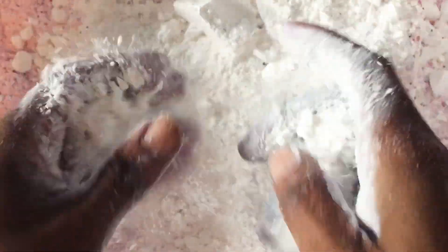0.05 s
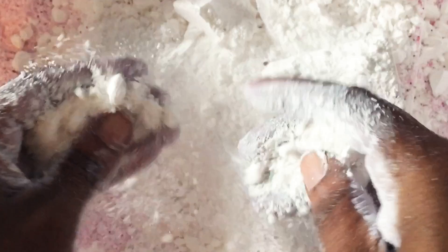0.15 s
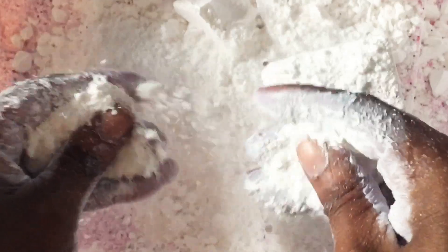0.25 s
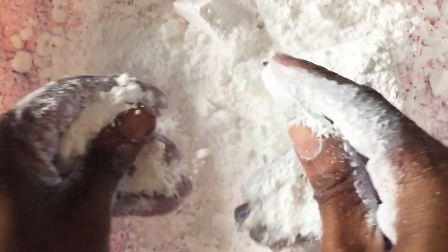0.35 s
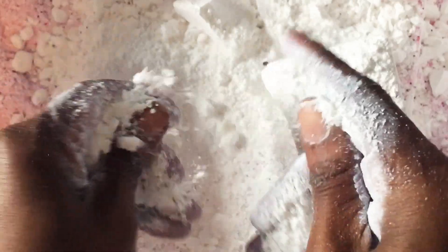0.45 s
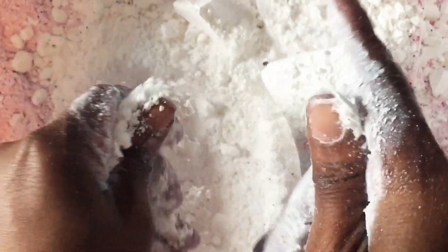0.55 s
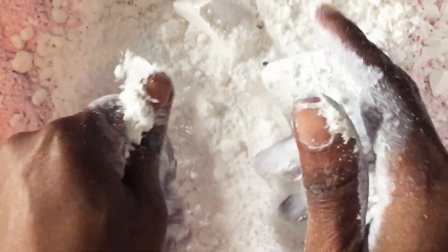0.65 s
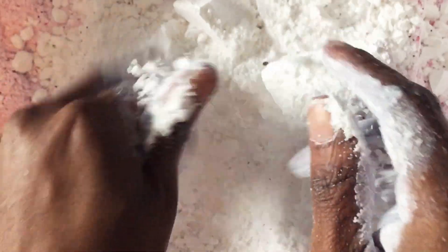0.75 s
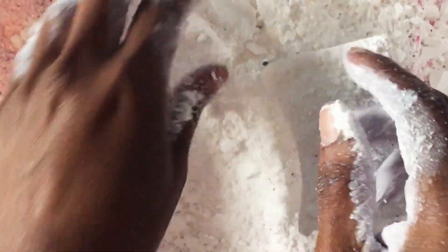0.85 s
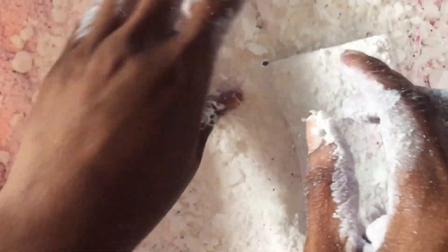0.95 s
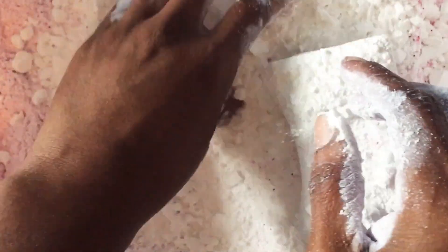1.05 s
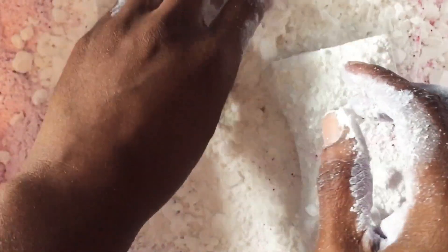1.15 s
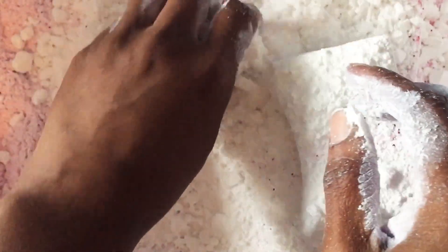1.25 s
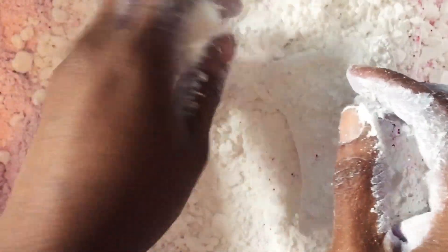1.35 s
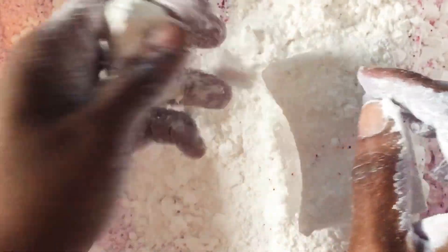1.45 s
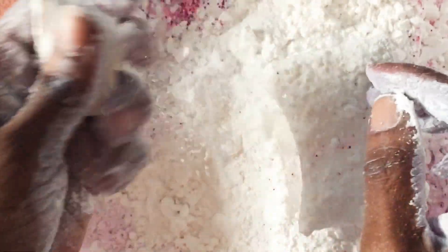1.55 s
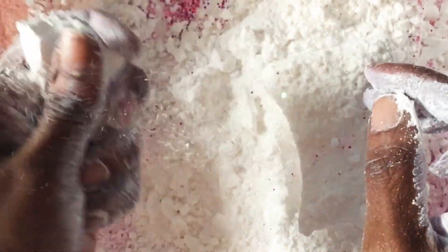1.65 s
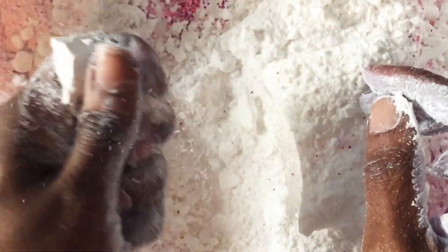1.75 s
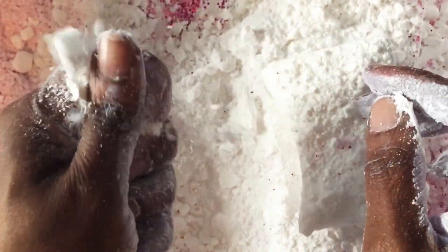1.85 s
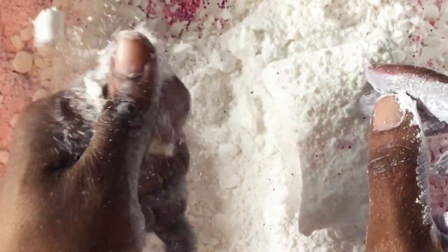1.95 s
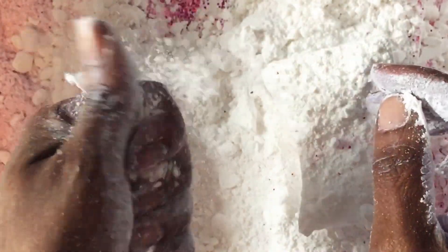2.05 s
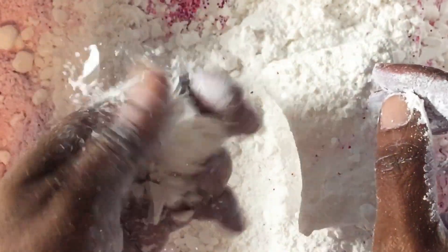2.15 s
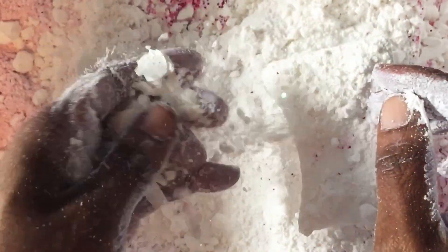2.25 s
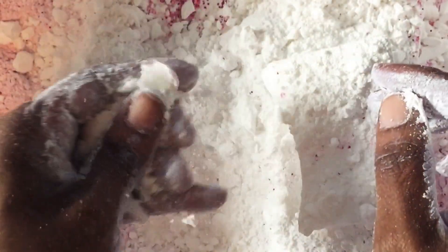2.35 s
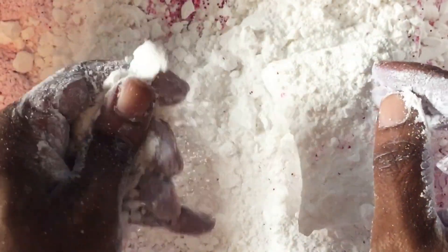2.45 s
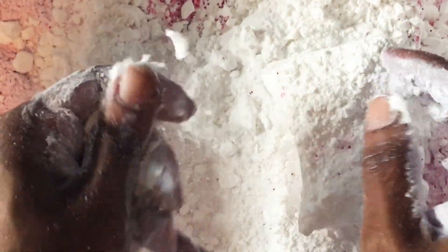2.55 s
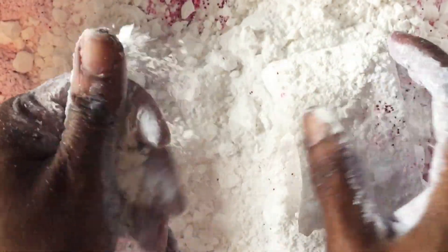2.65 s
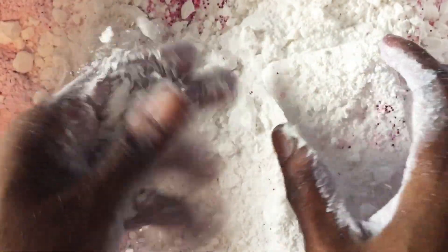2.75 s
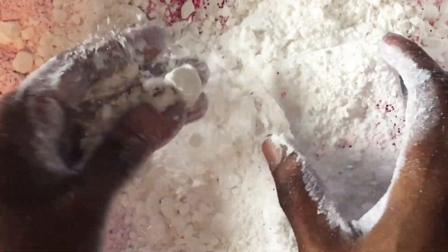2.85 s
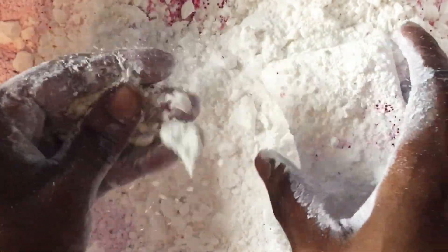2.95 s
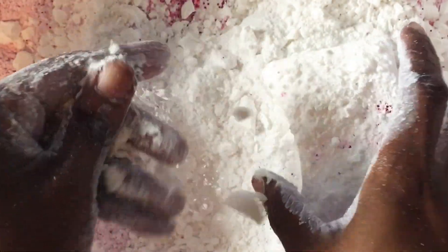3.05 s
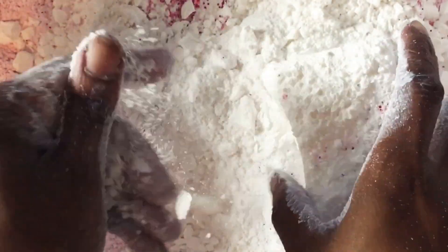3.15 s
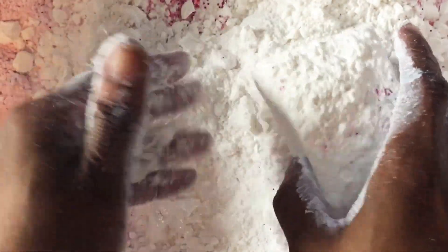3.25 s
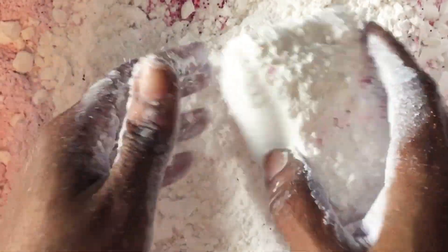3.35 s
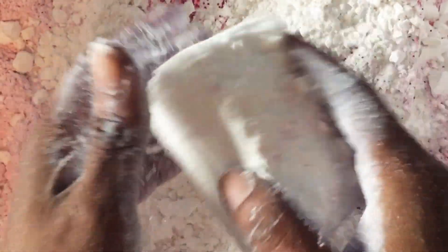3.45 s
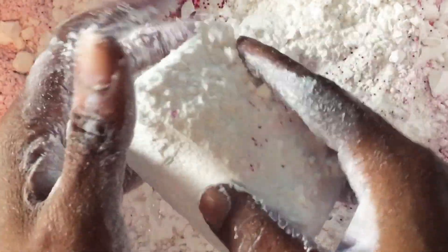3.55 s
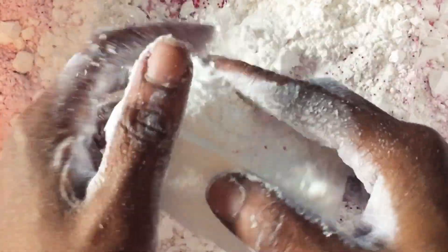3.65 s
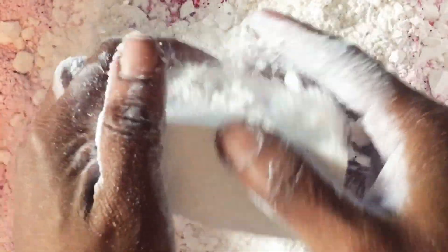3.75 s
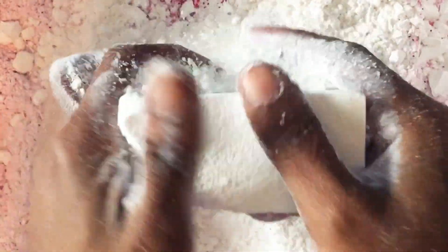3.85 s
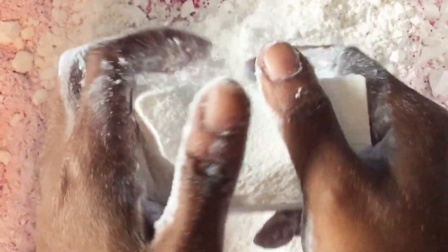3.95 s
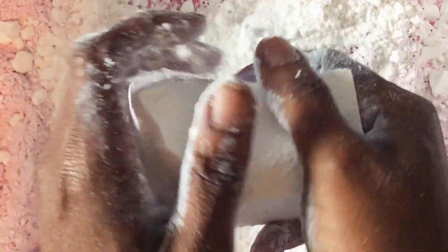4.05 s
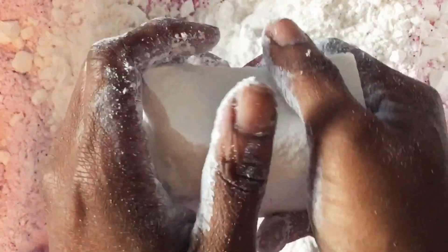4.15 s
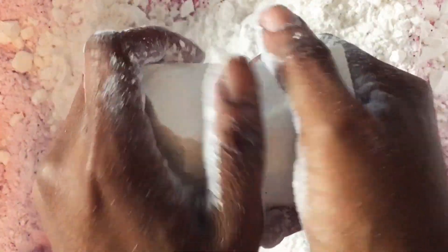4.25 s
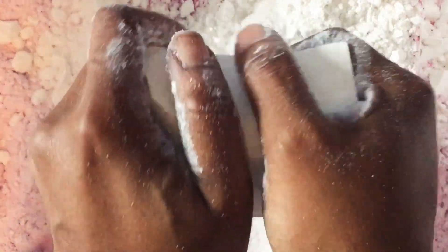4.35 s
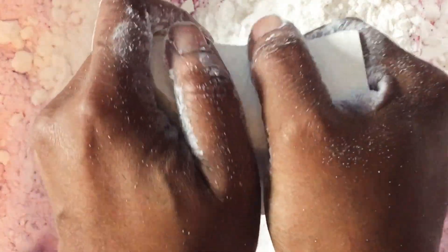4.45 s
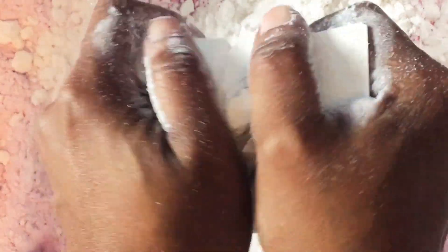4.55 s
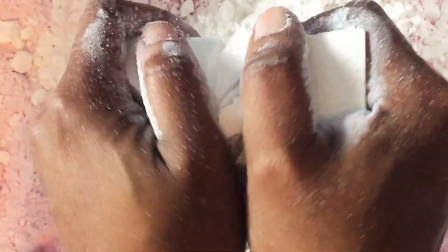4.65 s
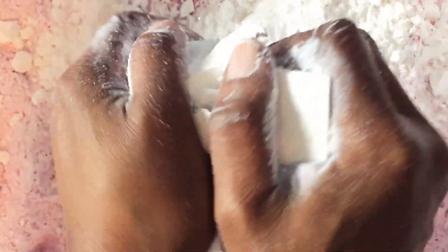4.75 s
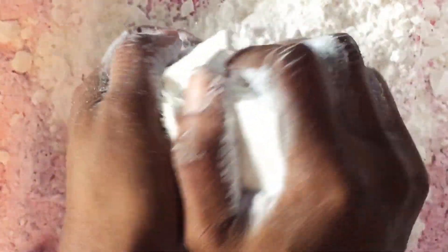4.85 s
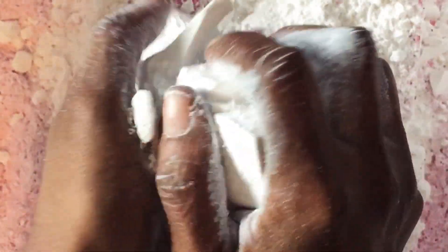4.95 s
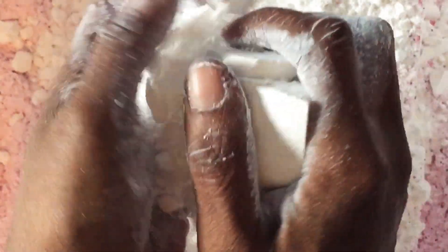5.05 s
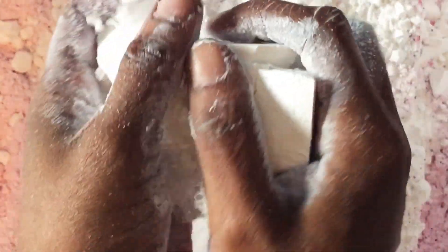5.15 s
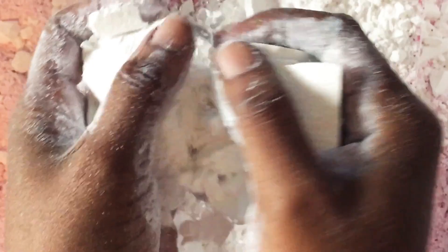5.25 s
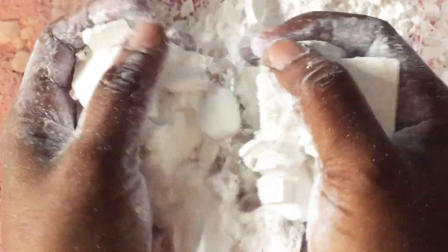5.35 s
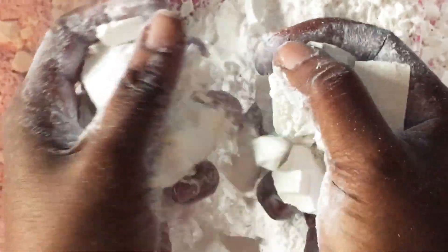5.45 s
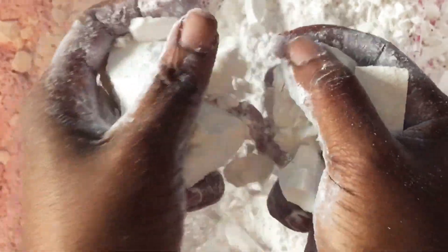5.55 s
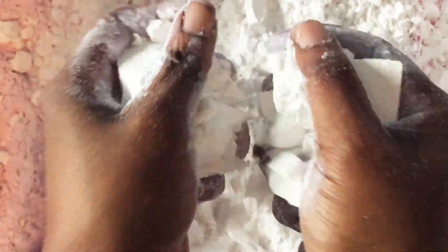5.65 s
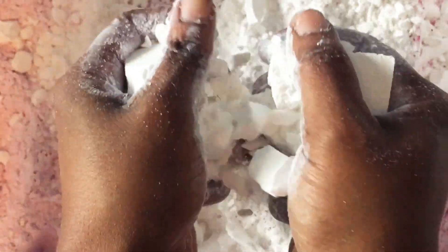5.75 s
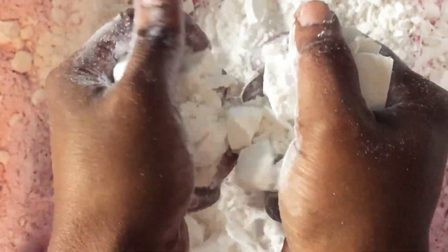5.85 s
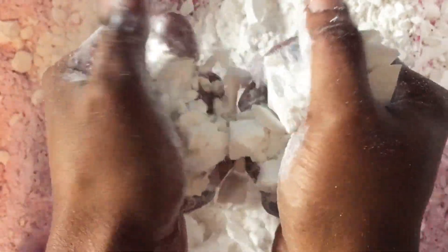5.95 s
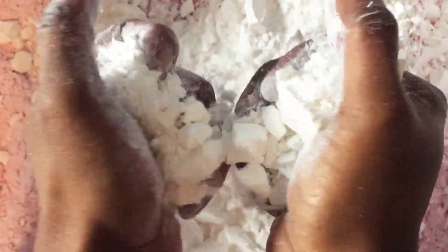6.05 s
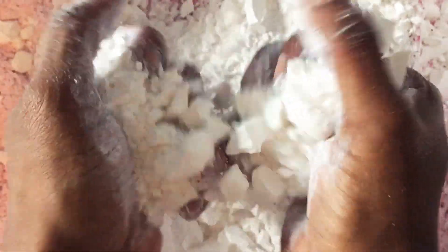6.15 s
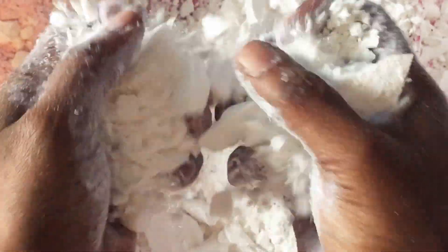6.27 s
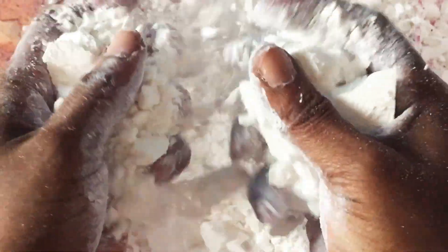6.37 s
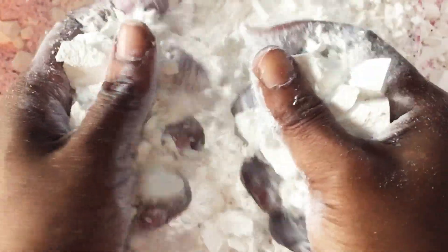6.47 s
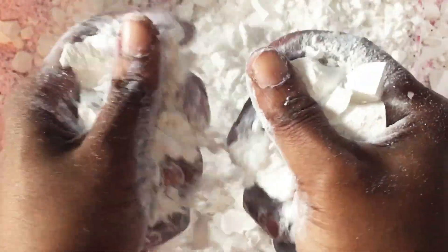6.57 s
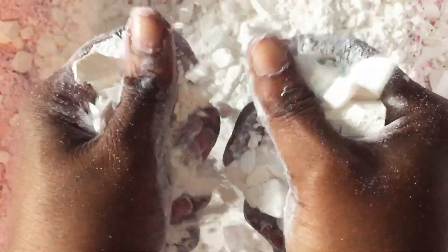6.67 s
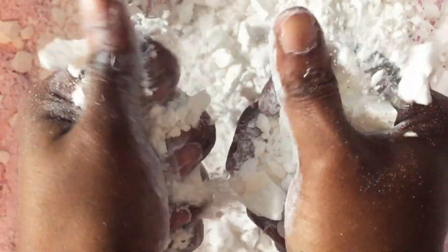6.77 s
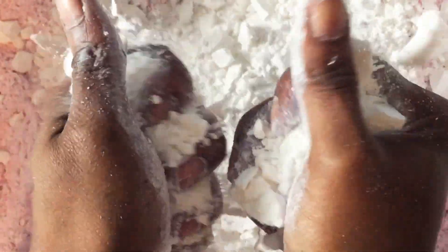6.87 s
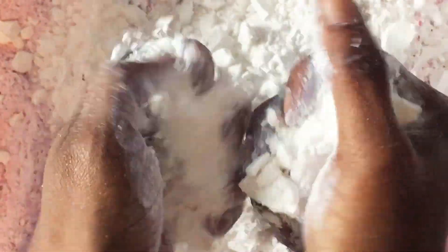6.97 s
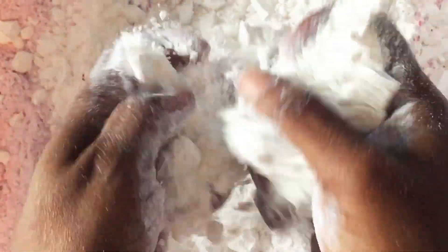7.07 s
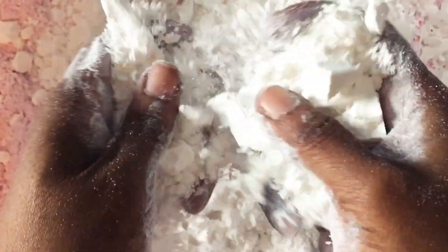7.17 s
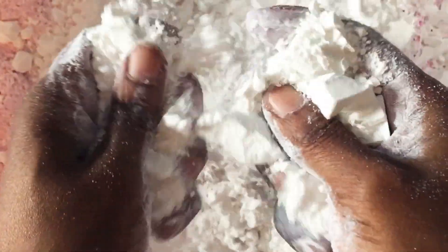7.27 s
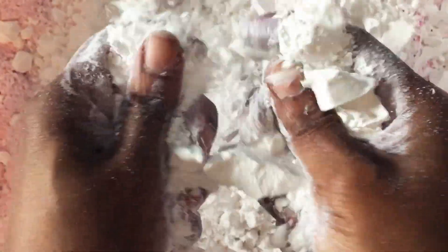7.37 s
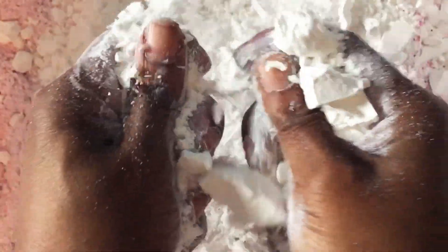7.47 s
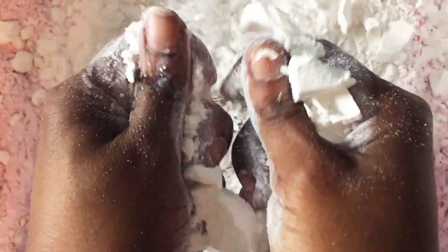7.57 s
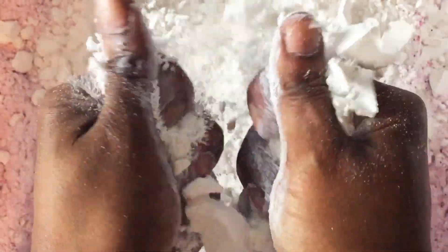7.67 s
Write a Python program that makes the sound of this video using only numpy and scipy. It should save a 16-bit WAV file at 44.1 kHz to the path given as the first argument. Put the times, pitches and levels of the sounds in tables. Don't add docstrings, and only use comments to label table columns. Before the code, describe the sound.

Hands rub powder and break hard dry chalk up close: soft gritty rustling, one very loud sharp snap, then dense crunching and crumbling.

```python
import sys
import numpy as np
from scipy import signal
from scipy.fft import rfft, irfft
from scipy.io import wavfile
from scipy.ndimage import uniform_filter1d

SR = 44100
rng = np.random.default_rng(int(sys.argv[2]) if len(sys.argv) > 2 else 0)


def digitize_waveform(pressure):
    field = np.atleast_2d(pressure).T
    bounded = np.clip(field, -1, 1)
    quanta = np.round(bounded * 32767).astype(np.int16)
    wavfile.write(sys.argv[1], SR, quanta)


def gain_from_decibels(decibels):
    exponent = np.asarray(decibels, float) / 20
    return 10 ** exponent


N = 339999

CORNER_BREAKS = [(1.5712, -27, 1740, -56), (1.5873, -22.5, 1000, -30), (1.6293, -19, 920, -22),
                 (1.6402, -25, 2550, -22), (1.6679, -30, 2290, -18), (1.6816, -19, 1020, -18),
                 (1.717, -35, 2730, -28.5), (1.7581, -13, 1390, -21), (1.775, -32, 674, -26),
                 (1.9102, -29, 920, -22), (2.016, -41, 1450, -36.5), (2.072, -22.5, 570, -32.5),
                 (2.1114, -33, 1590, -28)]
BLOCK_BREAKS = [(4.5337, -16.5, 510, -17), (4.568, -30, 900, -19), (4.5696, -13.5, 515, -16),
                (4.5738, -13, 2800, -14), (4.576, -4.5, 2100, -4.5), (4.5765, 2.5, 2040, -3.5),
                (4.5795, -12, 1900, -10.5), (4.582, -23, 1200, -19), (4.5855, -9, 794, -24),
                (4.5889, -8.5, 900, -10), (4.5898, -10, 2030, -14), (4.6035, -19, 476, -28),
                (4.6062, -25, 700, -28), (4.6162, -14, 2600, -22), (4.618, -15, 1000, -25),
                (4.5772, -6.5, 540, -27), (4.583, -9, 1290, -19), (4.5906, -8.5, 1950, -11),
                (4.5941, -6, 960, -24), (4.598, -10, 1700, -10), (4.6144, -10, 1220, -13),
                (4.75, -22.5, 1400, -21), (4.7667, -21, 1570, -25), (4.8345, -45, 2000, -33),
                (4.9675, -36, 1500, -28), (4.903, -24.5, 1340, -19), (4.93, -23.5, 1670, -33),
                (4.975, -31, 1000, -35), (5.0668, -28, 1140, -27), (5.131, -47, 3180, -19.5),
                (5.225, -27, 1020, -26), (5.2456, -29.5, 2080, -28), (5.3934, -17, 845, -34),
                (5.4199, -28, 1000, -16.5), (5.4944, -26, 1100, -40)]
HALF_BREAKS = [(5.5602, -12, 645, -42), (5.589, -23, 1170, -30), (5.609, -19.5, 487, -42),
               (5.579, -38, 1860, -28), (5.643, -15.5, 530, -20), (5.6543, -8, 870, -10.5),
               (5.668, -15, 1630, -16.5), (5.676, -11, 1400, -13.5), (5.711, -17, 915, -13),
               (5.716, -11.5, 1240, -22), (5.7405, -16.5, 1600, -25), (5.7508, -15, 1240, -32),
               (5.754, -13.5, 840, -31), (5.7743, -18.5, 1050, -24), (5.8353, -21, 1900, -25),
               (5.874, -14, 1460, -20), (5.889, -14.5, 960, -27), (5.936, -22, 1360, -19.5),
               (6.0057, -11, 1220, -20.5), (6.038, -8.5, 770, -13), (6.1064, -10.5, 900, -13.5),
               (6.2731, -13.5, 1740, -20.5)]
LUMP_BREAKS = [(6.335, -40, 840, -21), (6.3812, -13.5, 2400, -35), (6.3971, -22, 1780, -20.5),
               (6.446, -19.5, 1640, -24), (6.4856, -20, 1540, -18.5), (6.4927, -16.5, 2440, -38),
               (6.5297, -26, 1710, -22.5), (6.5365, -13, 970, -25), (6.6408, -27, 930, -25),
               (6.6569, -20.5, 660, -21.5), (6.7497, -12, 1050, -21), (6.758, -16, 1350, -20.5),
               (6.842, -34, 2200, -24), (6.8738, -39, 780, -19.5), (6.9003, -26.5, 750, -26),
               (6.928, -26, 2060, -25.5), (6.938, -25.5, 2270, -19.5), (7.0173, -10.5, 1050, -39),
               (7.131, -31, 920, -31), (7.2732, -15.5, 880, -38), (7.296, -25, 1550, -30),
               (7.3455, -5, 940, -34.5), (7.4446, -19.5, 446, -18.5), (7.5231, -25, 1330, -36),
               (7.588, -23.5, 1590, -27), (7.612, -28.5, 1160, -30.5)]
SMALL_TICKS = [(0.082, -34, 794, -43), (0.598, -34.5, 700, -43), (0.855, -37, 1100, -41.5),
               (2.393, -44, 2000, -34), (3.3845, -35.5, 2910, -43), (3.404, -38.5, 2900, -44),
               (0.1181, -27.5, 2200, -40), (0.1646, -32, 1890, -55), (0.2247, -30.5, 952, -36.5),
               (0.331, -26.5, 2340, -34), (0.6282, -37, 902, -39), (0.895, -33.5, 980, -45),
               (1.246, -50, 2900, -34), (1.279, -55, 2920, -28), (1.294, -43, 2400, -31),
               (2.145, -34, 620, -68), (2.235, -28, 785, -57), (2.274, -33, 2180, -42),
               (2.358, -39, 1890, -34), (2.38, -32.5, 760, -29), (2.456, -31.5, 477, -33),
               (2.6684, -28, 784, -40), (3.019, -25.5, 2850, -47.5), (3.921, -34, 2730, -25.5),
               (4.0027, -31, 1810, -41), (4.0788, -33.5, 1610, -36), (4.176, -35.5, 616, -50),
               (4.2694, -30.5, 1890, -27), (4.4154, -34, 576, -31.5), (0.667, -30, 800, -43),
               (0.0207, -35, 930, -45), (0.0756, -39, 710, -43), (0.0912, -48, 2800, -38),
              (0.1343, -50, 2450, -38), (0.1832, -39, 2610, -47), (0.352, -34, 2970, -39),
              (0.4467, -47, 930, -49), (0.8832, -32, 2530, -47), (0.93, -39, 650, -44),
              (0.9445, -57, 1700, -40), (0.969, -48, 520, -55), (1.076, -37, 820, -50),
              (1.067, -45, 2400, -44), (1.132, -48, 2900, -32.5), (1.154, -33, 2800, -34),
              (1.237, -33, 2600, -36), (1.5657, -38, 880, -38), (1.608, -30, 1010, -34),
              (1.614, -37, 2630, -32), (1.7245, -40, 2990, -31), (1.838, -32, 820, -29),
              (1.9562, -43, 1080, -50), (1.978, -40, 1980, -42), (2.1079, -32, 970, -51),
              (2.1143, -28, 523, -46), (2.165, -41, 880, -42), (2.2278, -40, 2390, -43),
              (2.276, -34, 615, -45), (2.42, -34, 2500, -40), (2.4415, -30, 2780, -33),
              (2.7812, -44, 2930, -40), (2.8502, -44, 1017, -39), (2.952, -40, 520, -46),
              (2.9805, -39, 520, -53), (3.1058, -47, 990, -53), (3.1832, -32.5, 918, -40),
              (3.236, -43, 716, -44), (3.9122, -32, 2430, -28), (4.2783, -39, 2520, -27.5),
              (4.4538, -41, 520, -39), (4.4907, -54, 620, -45), (4.495, -52, 1460, -46),
              (4.5426, -39, 2860, -27), (4.7889, -12, 1480, -9), (4.802, -36, 1190, -23),
              (4.8465, -41, 650, -31), (4.8904, -26, 2090, -19.5), (4.9432, -36, 670, -42),
              (5.0005, -32, 1550, -23), (5.031, -35, 626, -39),
               (5.0901, -31, 1120, -29), (5.171, -30, 930, -45), (5.1829, -31, 600, -26.5),
               (5.1858, -31, 710, -34), (5.3545, -42, 2990, -30), (5.413, -23.5, 1060, -28),
               (5.4256, -27, 725, -19.5), (5.457, -27, 1000, -35), (5.4744, -34, 1080, -26),
               (5.596, -29, 2150, -30), (5.6158, -16.5, 910, -20.5), (5.6253, -21, 2070, -16),
               (5.6508, -18, 2540, -15), (5.6808, -19, 1510, -24), (5.7294, -31, 2280, -23),
               (5.7813, -30, 650, -27), (5.8055, -32, 990, -39), (5.8195, -29, 1850, -28),
               (5.8374, -23.5, 730, -28), (5.8445, -29, 2170, -31), (5.8573, -30, 1270, -33),
               (5.9229, -29, 1210, -26), (5.9279, -26.5, 930, -31), (6.083, -35, 2540, -42),
               (6.2862, -30, 1250, -34), (6.3063, -40, 750, -39), (6.4288, -24, 2260, -35),
               (6.4541, -26, 1270, -22), (6.4595, -32, 2710, -27), (6.4642, -32, 840, -24),
               (6.495, -25, 2280, -30), (6.5011, -24, 1170, -37), (6.5044, -38, 2480, -28),
               (6.629, -28, 580, -34), (6.646, -39, 540, -30), (6.6942, -45, 1230, -26.5),
               (6.7027, -34, 840, -44), (6.7087, -29, 2000, -30), (6.7738, -34, 2860, -28),
               (6.8306, -41, 880, -35), (6.9147, -32, 1440, -28), (7.008, -33, 520, -38),
               (7.012, -36, 2990, -33), (7.085, -29, 1850, -51), (7.2672, -30, 1130, -35),
               (7.3657, -29, 520, -31), (7.4532, -23.5, 940, -22), (7.467, -33, 1100, -38),
               (7.5934, -33, 515, -26.5), (7.6737, -27, 1250, -41)]

# (start [s], length [s], rising share [0-1], effort [dB], fine grit re effort [dB])
STROKES = [(0, 0.15, 0.01, -56, -9), (.14, 0.39, 0.22, -53, -8), (.5, 0.42, 0.96, -56, -6),
           (1.02, 0.09, 0.4, -43.5, -30), (1.12, .1, 0.57, -37, -14.5), (1.185, 0.084, .75, -35, -18),
           (1.25, 0.085, 0.13, -35, -19.5), (1.33, 0.16, 0.5, -50.5, -8.5), (1.52, 0.45, 0.7, -55.5, -4.5),
           (2.0, 0.23, 0.45, -52.5, -10), (2.2, 0.32, 0.98, -54, -8), (2.48, 0.268, 0.9, -56, -7),
           (2.84, 0.51, 0.76, -55, -5), (3.36, 0.25, 0.92, -55.5, -5.5), (3.63, 0.39, 0.74, -52, -2.5),
           (4.07, 0.12, 0.87, -61.5, 5), (4.235, 0.22, 0.24, -48.5, -5)]
# (start [s], length [s], rising share [0-1], effort [dB], fine grit re effort [dB])
SQUEEZES = [(4.576, 0.029, 0.4, -23, -11), (4.588, 0.14, 0, -36.5, -13.5), (4.715, 0.14, 0.43, -36.5, -8.5),
            (4.809, 0.4, 0.53, -43.5, -6.5), (5.09, 0.34, 0.66, -46, -3), (5.389, 0.15, 0.05, -36, -9),
            (5.541, 0.15, 0.45, -33.5, -10.5), (5.671, .14, 0.6, -39.5, -5.5),
            (5.797, 0.19, 0.34, -43, -7.5), (5.917, 0.34, 0.22, -44.5, -7.5),
            (6.106, 0.63, 0.73, -39.5, -8.5), (6.667, 0.18, 0.52, -46, -5),
            (6.759, 0.24, 0.45, -47.5, -8.5), (6.987, 0.36, 0.3, -44, -12.5), (7.2, 0.35, 0.46, -42.5, -10),
            (7.45, 0.42, 0.63, -42.5, -10)]
# (start [s], length [s], rising share [0-1], weight [dB])
PRESSES = [
    (1.04, 0.32, 0.27, -34.5),
    (2.85, 0.54, 0.55, -51.5),
    (5.18, 0.21, 0.55, -40.5),
    (5.83, 0.098, 0.46, -40),
    (6.2, 0.55, 0.66, -41.5),
    (7.2, 0.27, 0.4, -37),
]
# (start [s], length [s], rising share [0-1], steadiness [dB])
SMOOTH_SLIDING = [
    (.98, 0.56, 0.62, -3),
    (3.1, 1.28, 0.3, 1),
    (4.6, 0.16, .3, -1),
]
# (start [s], length [s], rising share [0-1], level [dB], resonance [Hz])
SKIN_SLIDES = [
    (0, 0.31, 0.8, -65, 2660),
    (0.305, 0.1, .4, -56, 2760),
    (.5, .13, 0.25, -60.5, 2550),
    (0.652, .14, .2, -61, 2600),
    (2.49, 0.31, 0.12, -66, 2700),
    (3.35, 0.3, 0.66, -66, 2120),
    (3.848, 0.22, 0.9, -78, 3030),
]
# (start [s], length [s], rising share [0-1], level [dB])
PALM_BRUSHES = [
    (3.62, 0.47, 0.18, -57.5),
    (5.39, 0.077, 0.3, -48),
]
# (from [Hz], to [Hz], width [Hz], level [dB])
PALM_GAPS = [
    (2600, 2900, 650, -5),
    (4600, 4700, 350, -5),
    (6500, 8300, 1500, -0.5),
    (5940, 5700, 400, -14),
]

# (time [s], peak [dB], pitch [Hz], t60 [s])
CHIPS = [
    (0.816, -42, 6080, 0.029),
    (1.093, -33, 6680, 0.016),
    (1.281, -40.5, 6500, 0.032),
    (5.078, -37, 4330, 0.032),
    (5.1266, -26, 3280, 0.024),
    (5.188, -38, 3230, 0.048),
    (5.2157, -26.5, 3230, 0.035),
]
# (time [s], level [dB], pitch [Hz])
FINGER_SQUEAK = [
    (3.86, -75, 5700),
    (3.875, -45, 5460),
    (3.9, -51, 5430),
    (3.93, -70, 5270),
]
# (time [s], peak [dB], lowest mode [Hz], t60 [s])
KNOCKS = [(1.164, -32, 83.6, 0.81), (2.071, -29, 120, 0.03), (2.232, -35, 175, 0.028),
          (3.555, -32, 81.6, 0.019), (4.5688, -24, 213, 0.043), (4.5764, -12, 270, 0.035),
          (5.559, -25, 129, 0.077), (5.609, -19, 107, 0.16), (6.378, -26.5, 204, 0.033),
          (6.75, -32, 197, 0.052), (7.018, -30.5, 94, 0.12), (7.273, -19, 283, 0.027),
          (7.3455, -13, 213, 0.063)]
# (pitch [Hz], level [dB], share of the t60 [0-1])
TRAY_MODES = [(425, -5, 1), (587, -3.5, 0.66)]
# (multiple of the pitch [1], level [dB])
CHIP_MODES = [(1.63, -12), (2.72, -11)]

CRACK_SPECTRUM = [(1000, -45.5), (2500, 5.5), (3600, -0.5), (4800, 4), (6500, 1), (9000, -7.5),
                  (12000, -13.5), (16000, -20)]
CRUMB_SPECTRUM = [(120, -22), (300, -4), (600, 0), (1200, -5), (2000, -11), (3000, -19), (6000, -35),
                  (16000, -60)]
POWDER_SPECTRUM = [(900, -25), (2000, -4.5), (2700, 5.5), (3600, 0), (4600, 3.5), (6500, 0), (8500, -3.5),
                   (12000, -12), (16000, -14.5)]
THUMP_SPECTRUM = [(35, -16), (65, 7), (100, 4.5), (150, -1.5), (250, -8), (500, -48)]
ROOM_SPECTRUM = [(9, -4), (15, 13), (40, 0.5), (55, -3), (120, -9.5), (290, -19.5), (700, -26.5),
                 (1800, -57), (6700, -43), (16000, -50.5)]

EDGE_HZ = 15750
CREAK_S, CREAK_DB = .005, -22.5
SAG, SAG_S = 0.61, 0.0056
SWELL = 0.91
REST_DB, REST_FINE_DB = -64, -68
SHAKE, SHAKE_DB, SHAKE_TOP_DB = 0.84, -13, -34


def snaps():
    body, crack = np.zeros((2, N))
    t = np.arange(1500) / SR
    breaks = CORNER_BREAKS + BLOCK_BREAKS + HALF_BREAKS + LUMP_BREAKS + SMALL_TICKS
    for (s, db, hz, crack_db), luck in zip(breaks, rng.random((len(breaks), 5 + len(t)))):
        side, low, high, start, long = luck[:5]
        spit = evened(luck[5:] - .5)
        crisp = np.clip((crack_db - db + 39.5) / 22, 0, 1)
        t60 = 0.00036 + (4.33 + 3.7 * (1 - crisp)) / hz
        hand_hz = hz * (0.31 + 0.34 * low)
        stiff_hz = hz * (1.18 + 1.72 * high)
        swing = gain_from_decibels(-60 * t / t60) * np.sin(2 * np.pi * hz * t)
        swing += 0.38 * gain_from_decibels(-40 * t / t60) * np.sin(2 * np.pi * hand_hz * t + 2 * start)
        swing += 0.56 * crisp * gain_from_decibels(-70 * t / t60) * np.sin(2 * np.pi * stiff_hz * t)
        onset = np.minimum(t / (0.69 / hz + 0.0006 * (1 - crisp)), 1)
        add(body, s - .0005, np.sign(side - .3) * gain_from_decibels(db + 5.5) * swing * onset)

        late = t - CREAK_S
        rise = np.clip(late / (0.00095 + 0.0012 * start), 0, 1)
        fall = gain_from_decibels(-60 * abs(late) / (0.0025 + 0.0047 * long))
        fall += 0.027 * gain_from_decibels(-60 * abs(late) / 0.061)
        creak = gain_from_decibels(CREAK_DB) * (t / CREAK_S) ** 2 * (late < .001)
        add(crack, s - .0003 - CREAK_S, gain_from_decibels(crack_db) * spit * (rise * fall + creak))
    return body + gain_from_decibels(5.0) * colour(crack, CRACK_SPECTRUM)


def crumbling(clumps, grit):
    bed = patchy(depth_db=3.0) * gain_from_decibels(3.07 * clumps)
    return gain_from_decibels(-3.0) * effort() * evened(colour(bed + 1.32 * grit, CRUMB_SPECTRUM))


def powder(clumps, grit):
    bed = patchy(depth_db=1.8) * gain_from_decibels(2.34 * clumps)
    return gain_from_decibels(-1.0) * fine_effort() * evened(colour(bed + 1.19 * grit, POWDER_SPECTRUM))


def chips():
    out, t = np.zeros(N), np.arange(4000) / SR
    for (s, db, hz, t60), rattle in zip(CHIPS, rng.standard_normal((len(CHIPS), len(t)))):
        uneven = 1 + hz / 9000 * evened(uniform_filter1d(rattle, 45))
        ring = np.sin(2 * np.pi * hz * t)
        for multiple, mode_db in CHIP_MODES:
            if hz * multiple < EDGE_HZ:
                ring += gain_from_decibels(mode_db - 60 * t / .03) * np.sin(2 * np.pi * hz * multiple * t)
        decay = gain_from_decibels(db - 60 * t / max(t60, .005))
        add(out, s, decay * uneven * ring * np.minimum(t / 0.00094, 1))

    s, db, hz = np.transpose(FINGER_SQUEAK)
    t = np.arange(s[0], s[-1], 1 / SR)
    wobble = wander(hz=250)[:len(t)]
    turns = np.cumsum(np.interp(t, s, hz) * (1 + .02 * wobble)) / SR
    add(out, s[0], gain_from_decibels(np.interp(t, s, db)) * np.sin(2 * np.pi * turns))
    return out


def knocks():
    out, t = np.zeros(N), np.arange(8000) / SR
    for (s, db, hz, t60), tune in zip(KNOCKS, rng.uniform(0.844, 1.163, (len(KNOCKS), len(TRAY_MODES)))):
        sag = t + SAG * SAG_S * (1 - np.exp(-t / SAG_S))
        ring = gain_from_decibels(-60 * t / t60) * np.sin(2 * np.pi * hz * sag)
        ring += gain_from_decibels(-8.0 - 60 * t / min(t60, .05)) * np.sin(2 * np.pi * 1.48 * hz * sag)
        for (mode_hz, mode_db, share), detune in zip(TRAY_MODES, tune):
            short = share * min(t60, .06)
            ring += gain_from_decibels(mode_db - 60 * t / short) * np.sin(2 * np.pi * mode_hz * detune * t)
        add(out, s, gain_from_decibels(db) * ring * np.minimum(t / 0.0016, 1))
    return out


def tray():
    lumpy = rng.standard_normal(N) * gain_from_decibels(3.8 * wander(hz=22.8))
    return gain_from_decibels(-1.5) * tray_force() * evened(colour(lumpy, THUMP_SPECTRUM))


def slide():
    s, long, share, db, hz = np.transpose(SKIN_SLIDES)
    hollow_hz = np.interp(np.arange(N) / SR, s + long * share, hz)
    rub = rng.standard_normal(N) * gain_from_decibels(3.0 * wander(hz=20))
    level = gain_from_decibels(-81.0) + swells(zip(s, long, share, db))
    return gain_from_decibels(1.0) * level * resonate(rub, hollow_hz, width_hz=640)


def brush():
    rub = patchy(depth_db=1.2)
    high_pass = signal.butter(2, 6500, "high", fs=SR, output="sos")
    air = evened(signal.sosfilt(high_pass, signal.lfilter([1, .5], 1, rub)))
    start, length = PALM_BRUSHES[0][:2]
    along = np.clip((np.arange(N) / SR - start) / length, 0, 1)
    bands = np.zeros(N)
    for from_hz, to_hz, width_hz, db in PALM_GAPS:
        gap_hz = from_hz + (to_hz - from_hz) * along
        bands += gain_from_decibels(db + 2.6 * wander(hz=25)) * resonate(rub, gap_hz, width_hz)
    flutter = gain_from_decibels(3.0 * wander(hz=40))
    return flutter * (swells(PALM_BRUSHES) * air + gain_from_decibels(-3.5) * swells(PALM_BRUSHES[:1]) * bands)


def room():
    f, db = np.transpose(ROOM_SPECTRUM)
    hz = np.fft.rfftfreq(N, 1 / SR)
    shape = gain_from_decibels(np.interp(np.log(hz + 1), np.log(f + 1), db))
    return gain_from_decibels(-44.5) * evened(irfft(rfft(rng.standard_normal(N)) * shape, N))


def effort():
    return gain_from_decibels(REST_DB) + swells([row[:-1] for row in STROKES + SQUEEZES])


def fine_effort():
    moves = STROKES + SQUEEZES
    return gain_from_decibels(REST_FINE_DB) + swells([(s, long, share, db + fine_db) for s, long, share, db, fine_db in moves])


def tray_force():
    shake = np.minimum(gain_from_decibels(SHAKE_DB) * effort() ** SHAKE, gain_from_decibels(SHAKE_TOP_DB))
    return np.hypot(shake, swells(PRESSES))


def brittle():
    return np.clip(1 - swells(SMOOTH_SLIDING), 0, 1)


def grains(per_s, spread_db, burst_s, pitches_hz):
    size = gain_from_decibels(spread_db * np.minimum(rng.exponential(1, N), 3)) * (rng.random(N) < per_s / SR)
    kind = rng.integers(0, len(pitches_hz), N)
    decay = np.exp(-1 / (burst_s * SR))
    out = np.zeros(N)
    for k, hz in enumerate(pitches_hz):
        envelope = signal.lfilter([1], [1, -decay], size * (kind == k))
        puffs = envelope * rng.standard_normal(N)
        out += 1.8 * puffs + signal.lfilter(*signal.iirpeak(hz, 1.3, SR), puffs)
    return evened(out)


def patchy(depth_db):
    z = signal.stft(rng.standard_normal(N), nperseg=256)[2]
    streaks = uniform_filter1d(rng.standard_normal(z.shape), size=4, axis=0)
    streaks = evened(uniform_filter1d(streaks, size=20, axis=1))
    return evened(signal.istft(z * gain_from_decibels(depth_db * streaks), nperseg=256)[1][:N])


def swells(rows):
    power = np.zeros(N)
    for start, length, share, db in rows:
        top = length * np.clip(share, .02, .98)
        arc = np.interp(np.arange(0, length, 1 / SR), [0, top, length], [0, 1, 0])
        add(power, max(start, 0), gain_from_decibels(2 * db) * np.sin(np.pi / 2 * arc) ** (2 * SWELL))
    return np.sqrt(power)


def wander(hz):
    return evened(signal.sosfilt(signal.butter(2, hz, fs=SR, output="sos"), rng.standard_normal(N)))


def resonate(x, hz, width_hz):
    turn = np.exp(2j * np.pi * np.cumsum(hz) / SR)
    r = np.exp(-np.pi * width_hz / SR)
    return evened((signal.lfilter([1], np.convolve([1, -r], [1, -r]), x / turn) * turn).real)


def colour(x, points, size=4096):
    f, db = np.transpose(points)
    hz = abs(np.fft.fftfreq(size, 1 / SR))
    slope_db = np.interp(np.log(hz + 1), np.log(f + 1), db)
    slope_db -= 40 * np.maximum(np.log10(f[0] / (hz + 1)), 0)
    log_gain = np.log(gain_from_decibels(np.maximum(slope_db, -100)))
    taps = np.fft.ifft(np.exp(log_gain - 1j * signal.hilbert(log_gain).imag)).real
    return signal.oaconvolve(x, taps[:size // 2])[:len(x)]


def evened(x):
    return x / np.sqrt(np.mean(x ** 2) + 1e-20)


def add(mix, s, sound):
    part = mix[round(s * SR):][:len(sound)]
    part += sound[:len(part)]


def scene():
    clumps = wander(hz=26.7) * (0.51 + 0.5 * brittle())
    fractures = grains(per_s=600, spread_db=5.5, burst_s=0.00036, pitches_hz=[700, 1500, 2600, 5000, 8000])
    grit = 0.75 * brittle() * gain_from_decibels(2.7 * clumps) * fractures
    near = snaps() + crumbling(clumps, grit) + powder(clumps, grit) + chips() + knocks() + tray() + slide()

    t = np.arange(SR // 4) / SR
    tail = rng.standard_normal(len(t)) * gain_from_decibels(-60 * t / 0.072) * (t > .003)
    tail = signal.lfilter([1], [1, -.7], tail)
    wet = signal.oaconvolve(near, tail / np.linalg.norm(tail))[:N]
    return (near + gain_from_decibels(-23.0) * wet + brush() + room())[None]


def low_pass(x):
    return signal.sosfilt(signal.butter(12, 16490, fs=SR, output="sos"), x)


def record(dry):
    limited = signal.oaconvolve(dry, signal.firwin(255, EDGE_HZ, fs=SR)[None], "same")
    return low_pass(np.clip(limited, -1, 1))


dry = scene()
out = record(dry)
digitize_waveform(out)
```